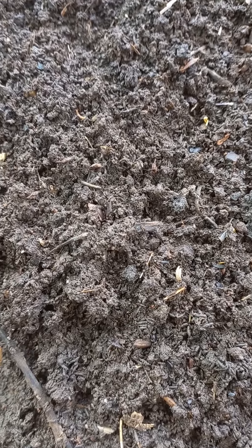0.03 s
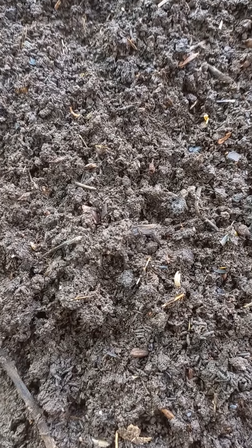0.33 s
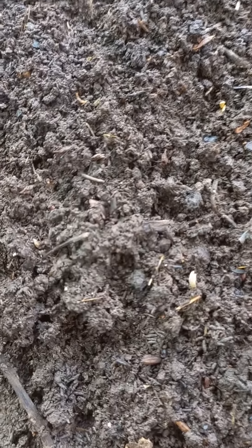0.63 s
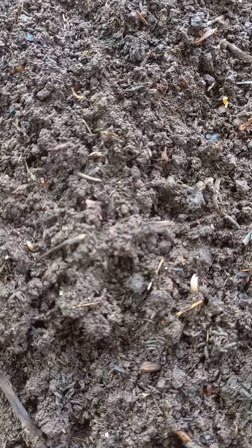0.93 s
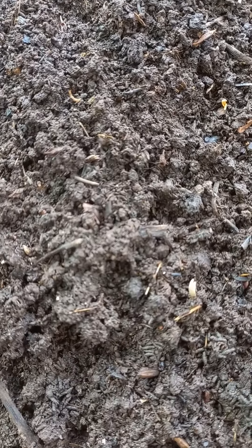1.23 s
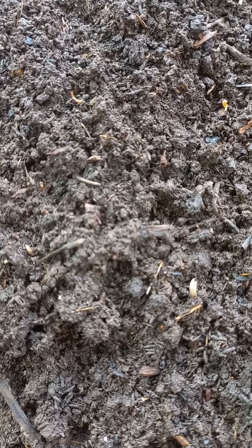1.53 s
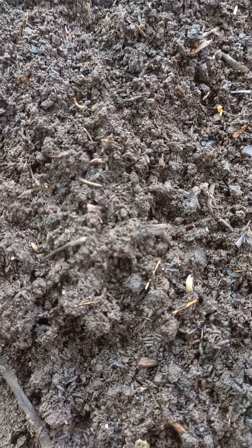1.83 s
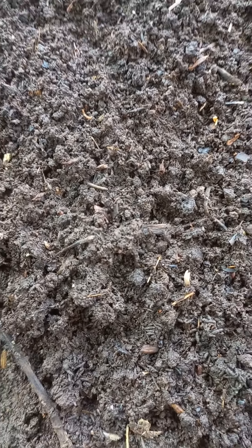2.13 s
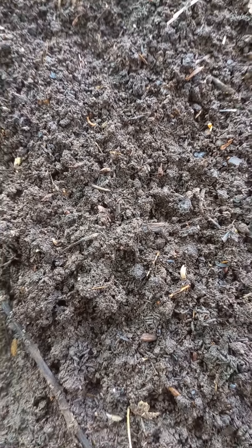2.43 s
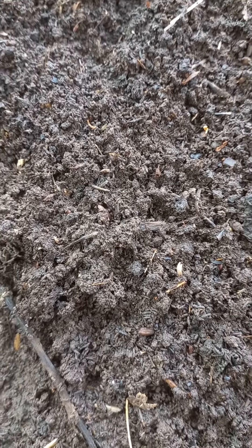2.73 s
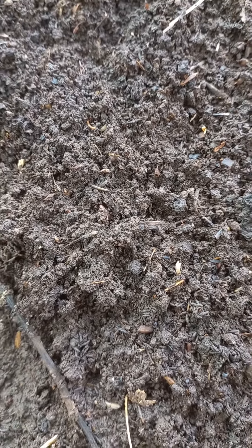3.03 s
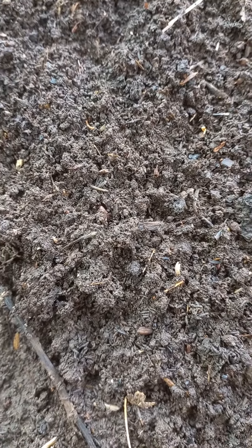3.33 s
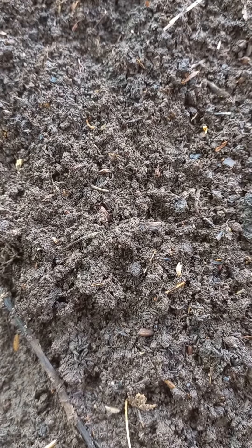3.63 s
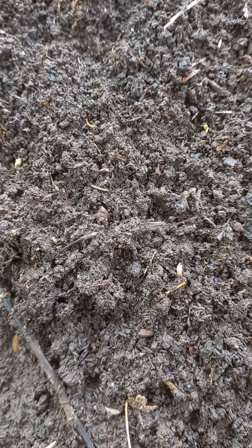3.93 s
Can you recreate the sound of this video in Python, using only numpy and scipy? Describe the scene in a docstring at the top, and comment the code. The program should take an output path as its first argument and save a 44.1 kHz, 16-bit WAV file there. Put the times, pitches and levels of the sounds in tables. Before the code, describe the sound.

A motorbike approaches with a low, thudding engine that grows louder as it slows. Its horn gives two short beeps midway, echoing off houses. Small birds chirp around the microphone over a faint street hiss.

```python
"""Motorbike approaching between houses

A stereo microphone outdoors among houses. A single-cylinder motorbike draws nearer, its engine slowing,
each firing a thump in the exhaust pipe. Its horn, a buzzing diaphragm and disc, beeps twice and rings
off the walls. Small birds chirp and whistle around the microphone, over a faint street hiss."""
import sys
import numpy as np
from scipy import signal
from scipy.fft import rfft, irfft
from scipy.io import wavfile

SR = 44100
rng = np.random.default_rng(int(sys.argv[2]) if len(sys.argv) > 2 else 0)


def wav_record(signal):
    """Record a signal, one row per channel, as 16-bit PCM in the file named by sys.argv[1]."""
    frames = np.transpose(np.atleast_2d(signal))
    bounded = np.clip(frames, -1, 1)
    # unit amplitude maps onto the largest positive 16-bit level
    quanta = np.round(bounded * 32767).astype(np.int16)
    wavfile.write(sys.argv[1], SR, quanta)


N = 176400
T = np.arange(N) / SR

# engine speed: (time [s], firing rate [1/s])
FIRING_RATE = [(0, 35.49), (.5, 35.4), (1, 34.96), (1.4, 34.2), (2, 32.69), (2.6, 31.53), (2.9, 30.57),
               (3.3, 30.62), (3.6, 29.78), (4, 29.27)]
# the engine's deep drone, which carries from afar: (frequency [Hz], gain [dB])
DRONE_BODY = [(30, -79.5), (50, 9), (66, 13.5), (105, 8), (140, 11), (176, -8), (250, 1), (340, -19),
              (480, -61), (800, -63.5)]
# boom of the exhaust pipe, coming closer: (time [s], level [dB]) and (frequency [Hz], gain [dB])
BOOM_LEVEL = [(0, -96), (.8, -74), (1.03, -64), (1.1, -44), (1.35, -40.5), (1.9, -38), (2.45, -41.5),
              (2.85, -47.5), (3.1, -39.5), (3.38, -40.5), (3.48, -32.5), (3.85, -30), (4, -30)]
PIPE_BODY = [(30, -64.5), (58, -29.5), (88, -3.5), (104, -2.5), (119, 5), (134, 0), (150, -5.5), (175, -12),
             (205, -28.5), (290, -36.5), (470, -47.5), (700, -72.5), (2000, -89.5)]
# the exhaust's overtones: (time [s], level [dB]) and (frequency [Hz], gain [dB])
OVERTONE_LEVEL = [(0, -66), (1, -66), (1.35, -57), (2, -55), (2.6, -66), (3.3, -70), (3.65, -56.5),
                  (4, -60)]
OVERTONE_BODY = [(100, -25.5), (200, -12), (250, 13.5), (290, -5.5), (350, 2), (400, -10.5), (480, -12),
                 (580, -23.5), (1000, -51.5)]
# a hollow resonance that swells on the way: (time [s], level [dB]) and (frequency [Hz], gain [dB])
HOLLOW_LEVEL = [(0, -77), (2.55, -66), (2.8, -57), (3.3, -50.5), (3.55, -71.5), (4, -69)]
HOLLOW_BODY = [(80, -35), (150, -25), (184, 17), (215, -18), (400, -59.5)]
# rush of exhaust gas: (time [s], level [dB]) and (frequency [Hz], gain [dB])
RUSH_LEVEL = [(0, -54), (1, -54), (1.35, -48.5), (1.8, -48.5), (2.05, -47.5), (2.4, -47.5), (2.9, -52),
              (3.35, -47.5), (3.65, -41), (4, -41)]
RUSH_SPECTRUM = [(25, -30.5), (60, -2.5), (125, 7), (230, -2.5), (350, -11.5), (470, -17.5), (600, -29.5),
                 (800, -38.5), (1500, -63.5)]

# horn beeps: (time [s], length [s], pitch [Hz], level [dB], pan L-R [dB])
BEEPS = [(1.509, 0.11, 448.5, -49, 20), (1.785, 0.1, 445, -48, -3)]
# the horn's disc and diaphragm: (harmonic [number], gain ahead [dB], gain towards the walls [dB])
HORN_HARMONICS = [(2, -25, -41), (3, -22.5, -33), (4, -44, -50), (5, -19, -20.5), (6, -2.5, -6),
                  (7, -7, -8), (8, 7, 2.5), (9, -13, -12.5), (10, -43, -21), (11, -25, -24),
                  (12, -18.5, -22), (13, -25, -29), (14, -38, -24.5), (15, -28, -29), (16, -32, -29),
                  (20, -29.5, -38.5), (27, -57, -34.5), (31, -38, -34), (32, -29, -28), (35, -30, -36)]
# rasp in the horn: (frequency [Hz], gain [dB])
RASP_SPECTRUM = [(1000, 0), (2200, 2.5), (3300, 16.5), (4300, -30), (6500, -7), (9500, -30), (12000, -21),
                 (14500, -27), (16000, -30)]
# slap off the house walls: (delay [s], gain [dB], pan L-R [dB])
WALL_ECHOES = [(.037, -5, -28), (.071, -19, 19)]

# birds around the microphone:
# (time [s], length [s], start pitch [Hz], end pitch [Hz], level [dB], pan L-R [dB], roughness [factor])
CHIRPS = [(0.058, .16, 5600, 5525, -83, -6, 0.05), (0.073, 0.049, 3660, 2960, -68, -1, 0.47),
          (0.161, 0.11, 4323, 3940, -67, 8, .12), (0.31, .055, 5540, 4690, -71, 0, 0.65),
          (0.324, 0.22, 4170, 3610, -77, -3, 0.98), (0.518, 0.024, 1800, 1510, -72, -9, 1.2),
          (.735, 0.038, 5470, 4610, -79.5, -2, 0.57), (0.849, .035, 4750, 4310, -79, -9, .4),
          (0.855, .09, 1994, 1687, -75.5, 0, 0.92), (0.869, 0.045, 3520, 2480, -76, -4, 1.06),
          (1.06, 0.054, 3700, 3610, -80.5, 0, 0.9), (1.2, 0.078, 623, 682, -69, -2, 0.3),
          (1.308, 0.16, 1420, 1310, -77, -10, 0.55), (2.013, .025, 5900, 6200, -63, 0, .4),
          (2.043, .022, 6100, 5950, -52, -1, .5), (2.043, .035, 5300, 4300, -57, 0, 1),
          (2.064, .04, 5710, 3920, -61, 14, 1.04), (2.103, .035, 4250, 3490, -57, -1, 1.05),
          (2.126, .035, 3400, 2710, -62.5, -3, 0.99), (2.05, 0.37, 1227, 1095, -79.5, -9, 0.8),
          (2.626, .12, 4300, 4360, -76.5, -2, 0.5), (2.758, .04, 5680, 5900, -74.5, -8, .4),
          (2.927, 0.077, 4420, 4630, -73, 13, 0.67), (3.258, .11, 3015, 3753, -64, -6, 0.17),
          (3.292, 0.053, 4830, 4420, -64.5, -10, 0.49), (3.335, 0.068, 3660, 4207, -58, -1.5, 0.09),
          (3.405, 0.092, 4224, 4150, -70.5, 7, 0.1), (3.456, 0.12, 3270, 4256, -63, 0, .12),
          (3.571, .11, 3147, 4390, -61, -1, 0.12), (3.85, 0.1, 3045, 2500, -60.5, 2, 0.57)]

# tyres and street hiss: (time [s], level [dB]) and (frequency [Hz], gain [dB])
TYRE_LEVEL = [(0, -80.5), (.8, -76.5), (1.2, -74.5), (1.6, -68.5), (2.4, -71), (2.9, -74), (3.3, -68),
              (3.7, -63), (4, -61.5)]
TYRE_SPECTRUM = [(300, -27.5), (700, -8.5), (900, -1), (1350, 4.5), (1750, 1.5), (2050, 0.5), (2500, -3),
                 (3400, -4), (5000, -6.5), (6000, -11), (7500, -17), (15500, -15)]
# soft hiss in the upper mids: (time [s], level [dB]) and (frequency [Hz], gain [dB])
HISS_LEVEL = [(0, -86), (.45, -75), (.8, -84.5), (1.1, -82.5), (1.4, -96), (2.3, -71.5), (2.7, -75),
              (3.1, -74.5), (3.7, -65), (4, -69)]
HISS_SPECTRUM = [(1500, -24), (2600, 2), (3400, -2), (5100, 3), (6200, -11), (8000, -22.5)]
# bed of still air and distant twitter: (frequency [Hz], gain [dB])
AIR_SPECTRUM = [(100, 1), (1000, 2), (2800, -12), (3600, -4.5), (5200, 3), (7500, -4.5), (11000, -4.5),
                (15500, -2)]
# how alike noise is on the microphone's two sides: (frequency [Hz], correlation [0-1])
STEREO_CORRELATION = [(40, 0.73), (130, 0.73), (250, 0.7), (500, 0.17), (1000, 0), (4000, 0)]

FIRST_FIRING_CYCLES = 0.4852  # share of a cycle before the first firing
FIRING_SPREAD_DB, FIRING_JITTER_S = .8, .00015
DRONE_DB, RUSH_PULSE_DB, ENGINE_PAN_DB, RUSH_PAN_DB = -51.5, 3, .6, -2
HORN_ATTACK_S, HORN_RELEASE_S, HORN_SAG_HZ_PER_S = .024, .015, 29.6
HORN_WAVER, HORN_WAVER_HZ, HORN_RASP_DB, HORN_WET_DB = .0065, 150, -18, 5
TRILL_DEPTH, TRILL_HZ = .09, 260
CHIRP_FADE = .25  # share of a chirp, at each end
BIRD_DIRECT_DB, BIRD_WET_DB, BIRD_ECHO_CUT_HZ = -4.5, -2, 4600
LEAVES_DB, LEAVES_T60_S = -1, .15
EARLY_T60_S, LATE_T60_S, LATE_DB, PREDELAY_S = .31, 1.16, -2.5, .012
AIR_DB, CUTOFF_HZ = -74.5, 15700


def engine():
    """The bike closes on the microphone: each firing thumps the exhaust pipe and lets out a puff of gas."""
    cycles = np.cumsum(in_time(FIRING_RATE)) / SR - FIRST_FIRING_CYCLES
    firing_s = np.interp(np.arange(int(cycles[-1]) + 1), cycles, T)
    jitter, strength = rng.standard_normal((N // 100, 2))[:len(firing_s)].T
    onsets = ((firing_s + FIRING_JITTER_S * jitter) * SR).astype(int)
    pulses = np.zeros(N)
    pulses[np.clip(onsets, 0, N - 1)] = from_db(FIRING_SPREAD_DB * strength)
    thumps = from_db(DRONE_DB) * resonate(pulses, DRONE_BODY)
    thumps += from_db(in_time(BOOM_LEVEL)) * resonate(pulses, PIPE_BODY)
    thumps += from_db(in_time(OVERTONE_LEVEL)) * resonate(pulses, OVERTONE_BODY)
    thumps += from_db(in_time(HOLLOW_LEVEL)) * resonate(pulses, HOLLOW_BODY)
    puff_db = RUSH_PULSE_DB * np.sin(2 * np.pi * cycles)
    rush = from_db(in_time(RUSH_LEVEL) + puff_db) * noise(RUSH_SPECTRUM)
    return panned(thumps, ENGINE_PAN_DB) + panned(rush, RUSH_PAN_DB)


def horn():
    """A buzzing diaphragm drives a disc ringing at the eighth harmonic; walls throw the beeps back."""
    numbers, *levels_db = np.transpose(HORN_HARMONICS)
    harmonics = np.arange(2, 36)
    gains = from_db([np.interp(harmonics, numbers, db) for db in levels_db])
    waver = 1 + HORN_WAVER * drift(HORN_WAVER_HZ)
    rasp = from_db(HORN_RASP_DB) * noise(RASP_SPECTRUM)
    at_mic, to_walls = 0, 0
    for start, length, hz, db, pan_db in BEEPS:
        t = T - start
        attack = np.clip(t / HORN_ATTACK_S, 0, 1)
        release = np.clip(1 - (t - length) / HORN_RELEASE_S, 0, 1) ** 2
        envelope = attack * release
        on = envelope > 0
        phase = 2 * np.pi * np.cumsum((hz - HORN_SAG_HZ_PER_S * t[on]) * waver[on]) / SR
        offsets = 2 * np.pi * rng.random((len(harmonics), 1))
        buzz = np.zeros((2, N))  # rows: straight ahead, towards the walls
        buzz[:, on] = rms_one(gains @ np.sin(np.outer(harmonics, phase) + offsets))
        ahead, aside = from_db(db) * envelope * (buzz + rasp)
        at_mic += panned(ahead, pan_db)
        to_walls += aside
    for delay, db, pan_db in WALL_ECHOES:
        slap = from_db(db) * np.interp(T - delay, T, to_walls)
        at_mic += panned(slap, pan_db)
    return at_mic + from_db(HORN_WET_DB) * houses(to_walls)


def birds():
    """Gliding whistles on either side, the rough ones with a fast uneven trill, blurred by foliage."""
    calls = np.zeros((2, N))
    trill = drift(TRILL_HZ)
    for start, length, from_hz, to_hz, db, pan_db, roughness in CHIRPS:
        on = (T > start) & (T < start + length)
        progress = (T[on] - start) / length
        glide_hz = from_hz + (to_hz - from_hz) * progress
        hz = glide_hz * (1 + TRILL_DEPTH * roughness * trill[on])
        fade = np.clip(np.minimum(progress, 1 - progress) / CHIRP_FADE, 0, 1)
        whistle = np.sqrt(2) * np.sin(2 * np.pi * np.cumsum(hz) / SR)
        calls[:, on] += panned(from_db(db) * np.sin(np.pi / 2 * fade) * whistle, pan_db)
    leaves = from_db(LEAVES_DB) * scatter(calls, from_db(-60 * T[:SR // 2] / LEAVES_T60_S))
    dulled = signal.sosfilt(signal.butter(4, BIRD_ECHO_CUT_HZ, fs=SR, output="sos"), calls)
    return from_db(BIRD_DIRECT_DB) * calls + leaves + from_db(BIRD_WET_DB) * houses(dulled)


def street():
    """Tyre noise and a soft hiss grow as the bike nears, over a bed of still air."""
    tyres = from_db(in_time(TYRE_LEVEL)) * noise(TYRE_SPECTRUM)
    hiss = from_db(in_time(HISS_LEVEL)) * noise(HISS_SPECTRUM)
    air = from_db(AIR_DB) * noise(AIR_SPECTRUM)
    return tyres + hiss + air


def houses(x):
    """Reverberation between the houses: a quick decay and a weaker long tail."""
    t = T[:SR]
    early = from_db(-60 * t / EARLY_T60_S)
    late = from_db(LATE_DB - 60 * t / LATE_T60_S)
    return scatter(x, (early + late) * (t > PREDELAY_S))


def scatter(x, decay):
    """Countless small reflections under a decay curve, different on each side of the microphone."""
    response = rng.standard_normal((2, len(decay))) * decay
    response /= np.sqrt(np.sum(response ** 2, axis=1, keepdims=True))
    return signal.fftconvolve(np.atleast_2d(x), response, axes=1)[:, :N]


def resonate(x, spectrum):
    """Ring a body with the given response; rms 1."""
    cepstrum = irfft(np.log(from_db(at_hz(spectrum, 2 * N))))
    cepstrum[1:N] *= 2  # minimum phase: the ringing follows the pulse
    cepstrum[N + 1:] = 0
    response = np.exp(rfft(cepstrum))
    return rms_one(irfft(rfft(x, 2 * N) * response)[:N])


def noise(spectrum):
    """Stereo noise, alike in the bass and diffuse in the treble; rms 1."""
    mid, side = rfft(rng.standard_normal((2, N)))
    alike = at_hz(STEREO_CORRELATION, N)
    stereo = np.sqrt(1 + alike) * mid + np.sqrt(1 - alike) * side * [[1], [-1]]
    return rms_one(irfft(stereo * from_db(at_hz(spectrum, N)), N))


def drift(rate_hz):
    """Random wander, smoothed above the given rate; rms 1."""
    pole = np.exp(-2 * np.pi * rate_hz / SR)
    wander = signal.lfilter([1], [1, -2 * pole, pole * pole], rng.standard_normal(N + SR))
    return rms_one(wander[SR:])


def panned(x, pan_db):
    """Place a sound in the stereo image; positive is left."""
    return x * rms_one(from_db([[pan_db / 2], [-pan_db / 2]]))


def in_time(rows):
    """A control curve at every sample."""
    return np.interp(T, *np.transpose(rows))


def at_hz(points, size):
    """A spectrum table on the bins of a transform."""
    hz, value = np.transpose(points)
    return np.interp(np.log(np.fft.rfftfreq(size, 1 / SR) + 1e-9), np.log(hz), value)


def from_db(db):
    """Decibels to gain."""
    return 10 ** (np.asarray(db) / 20)


def rms_one(x):
    """Scale to unit rms."""
    return x / np.sqrt(np.mean(x ** 2) + 1e-20)


def scene():
    """Street, motorbike, horn and birds as they reach the microphone."""
    return street() + engine() + horn() + birds()


def record(dry):
    """A steep low-pass takes off the highest treble."""
    return signal.sosfilt(signal.ellip(12, .1, 80, CUTOFF_HZ, fs=SR, output="sos"), dry)


dry = scene()
out = record(dry)
wav_record(out)
```